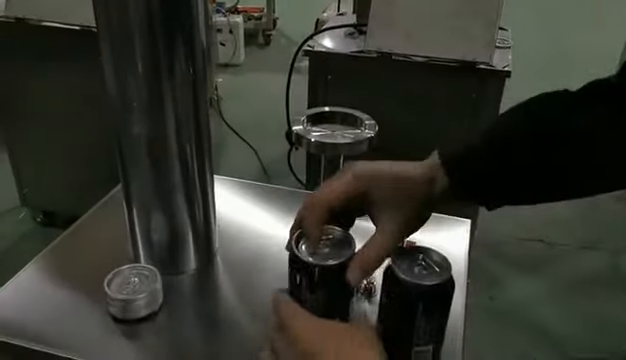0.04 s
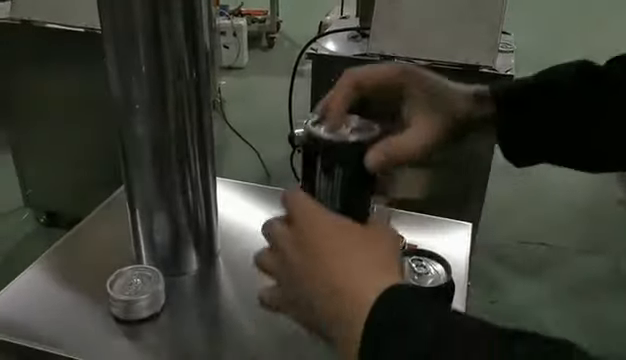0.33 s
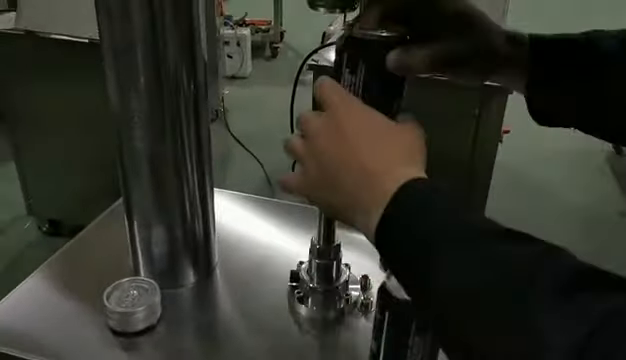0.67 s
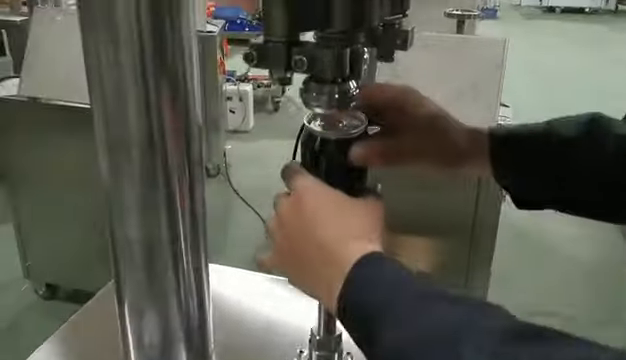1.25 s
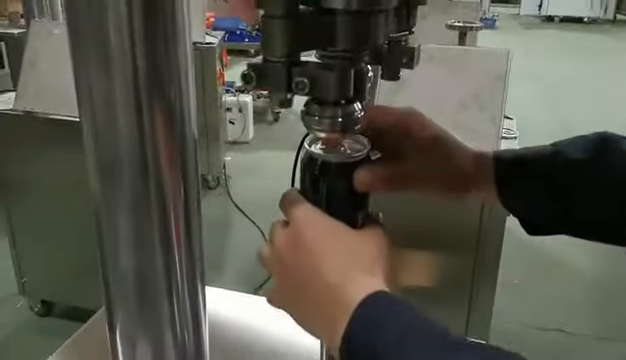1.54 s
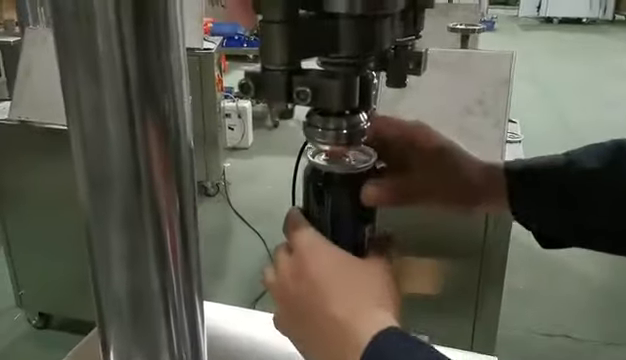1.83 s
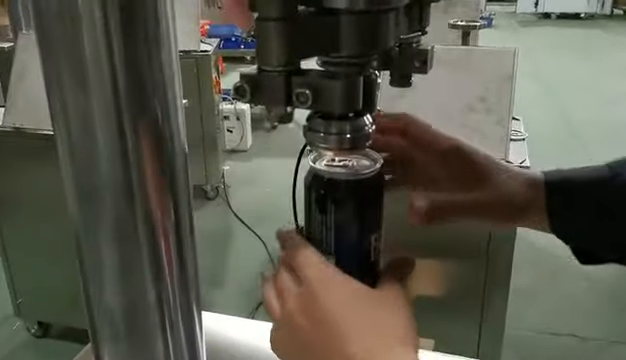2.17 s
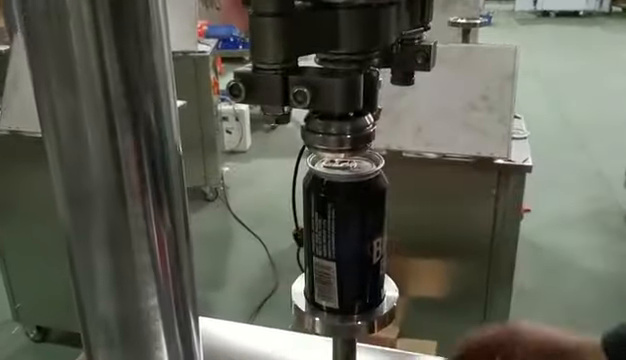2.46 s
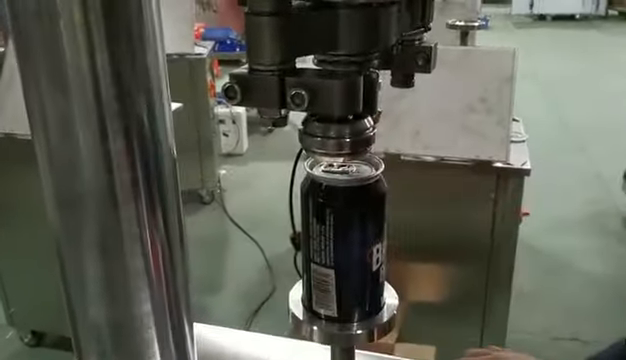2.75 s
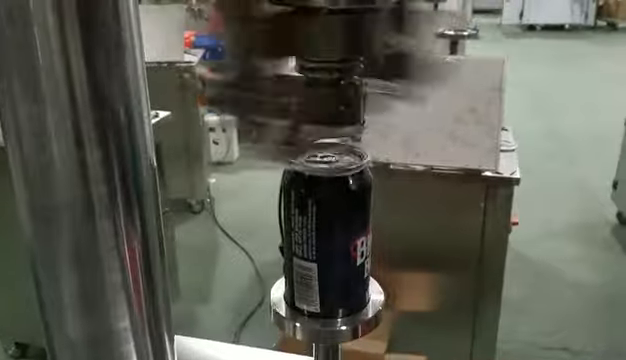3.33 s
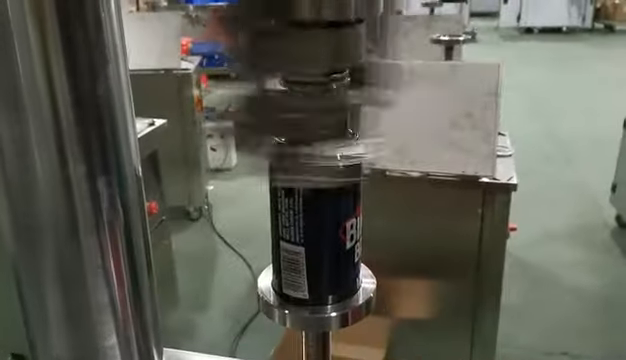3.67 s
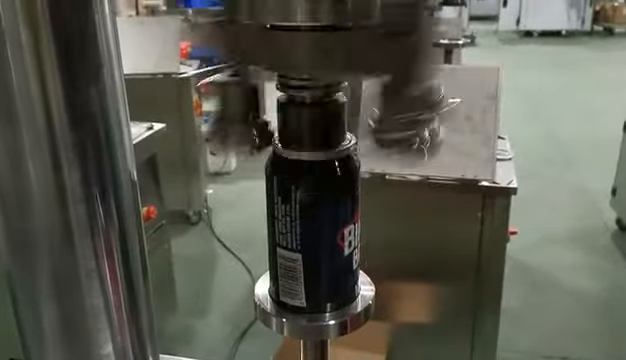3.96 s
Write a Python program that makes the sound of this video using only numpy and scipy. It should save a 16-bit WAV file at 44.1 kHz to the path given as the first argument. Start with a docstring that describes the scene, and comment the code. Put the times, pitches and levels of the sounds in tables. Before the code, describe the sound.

A can seaming machine clunks and whirs into motion after a can clacks into place.

```python
"""In an echoing workshop, with something scraping far off, a drinks can goes into a seaming machine.
The can rubs on its seat and clacks against the steel chuck that holds it; its lid is pressed home.
A knock rings the table, steel parts tick, an air valve hisses and the machine clunks into motion.
The motor hums, the gears whine and rattle, and the drone swells as spinning rollers close on the lid."""
import sys
import numpy as np
from scipy import signal
from scipy.fft import rfft, irfft
from scipy.io import wavfile

SR = 44100
rng = np.random.default_rng(int(sys.argv[2]) if len(sys.argv) > 2 else 0)


def unload_wav(signal):
    """Save mono or channel-first audio to the path in sys.argv[1] as 16-bit WAV at rate SR, clipped to [-1, 1]."""
    wavfile.write(
        sys.argv[1],
        SR,
        np.round(np.clip(np.atleast_2d(signal).T, -1, 1) * 32767).astype(np.int16),
    )


N = 176400
TIME, FREQS = np.arange(N) / SR, np.fft.rfftfreq(N, 1 / SR)
NOISE_TOP_HZ, CUTOFF_HZ = 7570, 8300
# how alike the two ears hear each pitch: (pitch [Hz], likeness [0 to 1])
EAR_LIKENESS = [(50, 0.89), (180, 0.94), (400, 0.81), (700, 0.6), (1200, 0.13), (2200, 0.022),
                (7500, 0.049)]


def from_db(db):
    """Turn decibels into a number to multiply by."""
    return 10 ** (np.asarray(db) / 20)


def rms_one(x):
    """Scale a signal to an average power of 1."""
    return x / np.sqrt(np.mean(x ** 2) + 1e-20)


def in_time(rows):
    """Join a table's timed rows with straight lines: one curve for each value column."""
    times, *columns = np.transpose(rows)
    return [np.interp(TIME, times, column) for column in columns]


def at_hz(points, hz):
    """Read a (pitch, value) table at any pitch."""
    pitches, values = np.transpose(points)
    return np.interp(np.log(hz + 1), np.log(pitches), values)


def pan(db):
    """Left and right gains that make the left louder by db."""
    return from_db(np.array([[.5], [-.5]]) * db)


def drift(rate_hz):
    """A smooth random wobble of typical size 1."""
    return rms_one(irfft(rfft(rng.standard_normal(N)) / (1 + (FREQS / rate_hz) ** 4), N))


def noise(colour, ripple_db=0, top_hz=NOISE_TOP_HZ):
    """Stereo noise of a given tone colour; ripple adds the many small resonances of steel panels."""
    alike = at_hz(EAR_LIKENESS, FREQS)
    bumps = np.clip(rng.standard_normal(SR // 50), -2, 2)
    ripple = np.interp(FREQS / 45, np.arange(len(bumps)), bumps)  # a bump or dip every 45 Hz
    shape = from_db(at_hz(colour, FREQS) + ripple_db * ripple * np.minimum(FREQS / 1500, 1))
    mid, side = rfft(rng.standard_normal((2, N))) * shape * (FREQS < top_hz)
    return rms_one(irfft(np.sqrt(1 + alike) * mid + np.sqrt(1 - alike) * side * [[1], [-1]], N))


def swell(start, length, rise_s, fall_db_per_s):
    """A loudness curve that rises, holds, then dies away."""
    fall = from_db(-fall_db_per_s * np.maximum(TIME - start - length, 0))
    return np.clip((TIME - start) / rise_s, 0, 1) * fall


def strike(blows, notes, crack_db):
    """Each blow cracks briefly and rings an object's own notes; a soft blow leaves out the high ones."""
    out, t = np.zeros(N + SR), TIME[:SR // 2]
    hz, note_db, ring_s = np.transpose(notes)
    rings = np.sin(2 * np.pi * hz[:, None] * t) * from_db(-60 * t / ring_s[:, None])
    signs = (-1) ** np.arange(len(hz))
    for start, db, treble_limit in blows:
        vary_db = 1.5 * rng.standard_normal(len(hz))
        gains = signs * from_db(db + note_db + vary_db) / np.sqrt(1 + (hz / treble_limit) ** 4)
        burst = rng.standard_normal(len(t)) * np.exp(-t / 0.0017) + 1e-18
        crack = signal.sosfilt(signal.butter(2, treble_limit, fs=SR, output="sos"), burst)
        i = int(start * SR)
        out[i:i + len(t)] += gains @ rings + from_db(db + crack_db) * crack
    return out[:N]


def in_hall(x, near_db, hall_db, pan_db):
    """Add quick echoes off the machine and the long echo of the hall to a sound."""
    # tone colour of the echoes: (pitch [Hz], level [dB])
    echo_colour = [(100, -8), (400, 1.5), (1500, 2), (2300, -4), (4000, -2), (7500, -5.5)]
    t, near_fade_s, hall_fade_s = TIME[:SR], 0.12, 0.96
    near = noise(echo_colour)[:, :SR] * from_db(-60 * t / near_fade_s) * (t > .002)
    far = noise(echo_colour)[:, :SR] * from_db(-60 * t / hall_fade_s) * (t > .012)
    echoes = (from_db(near_db) * rms_one(near) + from_db(hall_db) * rms_one(far)) / np.sqrt(SR)
    return x * pan(pan_db) + signal.fftconvolve(x[None], echoes, axes=1)[:, :N]


def room_noise():
    """The low, steady background of the hall."""
    # its tone colour: (pitch [Hz], level [dB])
    colour = [(20, -10.5), (42, 1.5), (70, 3.5), (130, -1), (220, -5.5), (340, -4), (500, -12),
              (1000, -19.5), (2000, -30), (4000, -29), (7500, -34.5)]
    return from_db(-54) * noise(colour)


def far_scraping():
    """Distant scraping strokes, each a grainy body and a hiss, hang in the hall."""
    # the strokes: (start [s], length [s], body level [dB], hiss level [dB])
    strokes = [(-0.12, 0.12, -53.5, -75), (0.33, 0.14, -70, -63.5), (1.105, 0.12, -44.5, -57),
               (1.245, 0.16, -48.5, -64.5), (1.8, 0.09, -48.5, -58.5), (1.969, 0.14, -41, -49)]
    # tone colours of the two parts: (pitch [Hz], level [dB])
    body_colour = [(150, -16.5), (300, -5.5), (500, -10), (670, -3), (930, -12.5), (1130, -8.5),
                   (1500, -15.5), (2200, -17), (3300, -18.5), (5000, -29), (8000, -44)]
    hiss_colour = [(500, -18), (2000, -1), (2650, -7.5), (4000, -0.5), (5400, -2.5), (6400, 0), (7500, 1.5)]
    body_power = hiss_power = 0
    for start, length, body_db, hiss_db in strokes:
        stroke = swell(start, length, rise_s=0.042, fall_db_per_s=52)
        body_power += (from_db(body_db) * stroke) ** 2
        hiss_power += (from_db(hiss_db) * stroke) ** 2
    grain = from_db(0.26 * drift(40))
    body = np.sqrt(body_power) * grain * noise(body_colour, ripple_db=3.5)
    return body + np.sqrt(hiss_power) * noise(hiss_colour)


def can_rubbing():
    """The can slides on its seat; each rub keeps one of its high notes ringing."""
    # the rubs: (start [s], length [s], level [dB], pitch [Hz], spread to each side [Hz])
    rubs = [(0.4, 0.098, -64.5, 5400, 330), (0.41, .11, -68, 2590, 110), (0.825, 0.027, -66, 4920, 80),
            (0.925, 0.08, -66, 4930, 100), (0.922, .02, -65, 7380, 280), (1.125, .04, -58.5, 6030, 170),
            (1.135, .06, -60, 7250, 280)]
    out = 0
    for start, length, db, hz, spread_hz in rubs:
        band = (FREQS < NOISE_TOP_HZ) / (1 + ((FREQS - hz) / spread_hz) ** 2)
        ring = rms_one(irfft(rfft(rng.standard_normal((2, N))) * band, N))
        out += from_db(db) * swell(start, length, rise_s=0.0088, fall_db_per_s=113) * ring
    return out


def rim_skitter(count, start_s, end_s):
    """Light, uneven blows as the rim skitters round the chuck while it is centred."""
    when, size = rng.random((count, 2)).T
    times = start_s + (end_s - start_s) * (np.arange(count) + when) / count
    quietest_db, range_db, treble_limit_hz = -53, 14, 2000
    return [(t, quietest_db + range_db * u, treble_limit_hz) for t, u in zip(times, size)]


def can_clacks():
    """The hand-held can hits the steel chuck and rings briefly."""
    # taps on the chuck: (time [s], level [dB], treble limit [Hz])
    taps = [(0.8036, -13, 9100), (0.8122, -31, 9100), (0.8170, -40, 9000), (0.914, -32, 1700),
            (0.936, -33, 2000), (0.991, -30, 1660), (1.010, -36, 1180), (1.024, -39, 1390)]
    # the can's notes: (pitch [Hz], level [dB], ring time [s])
    notes = [(144.8, -39, 0.96), (337, -36, 0.24), (753, -31, 0.0075), (810, -7.5, 0.012),
             (1403, -5, 0.0077), (1860, -6, 0.0074), (2050, -4, 0.012), (2490, -8, 0.0057),
             (3500, -15, .007), (4770, -41, 0.19), (5660, -19, 0.008), (6160, -17, 0.016),
             (7410, -11.5, 0.0089)]
    can = strike(list(taps) + rim_skitter(count=8, start_s=0.824, end_s=1.04), notes, crack_db=-36)
    for hz, sharpness in (1130, 6.7), (4200, 4.5):  # the hollow can gives off little at these pitches
        can = signal.lfilter(*signal.iirnotch(hz, sharpness, fs=SR), can + 1e-18)
    return in_hall(can, near_db=-14, hall_db=-16.5, pan_db=3.5)


def lid_and_plate():
    """The lid is pressed home on the can, then the lifting plate is bumped."""
    # blows on each part: (time [s], level [dB], treble limit [Hz])
    lid_presses = [(1.231, -39.5, 1100), (1.420, -40.5, 1990), (1.440, -39, 1800)]
    plate_bumps = [(1.826, -45.5, 2940)]
    # each part's notes: (pitch [Hz], level [dB], ring time [s])
    lid_notes = [(383, -3, 0.069), (450, -6, 0.051), (774, 1.5, 0.043), (1177, 2.5, 0.019),
                 (1325, 1.5, 0.029), (1640, -11.5, 0.053)]
    plate_notes = [(640, 5, 0.2), (1134, -11, 0.043)]
    lid = strike(lid_presses, lid_notes, crack_db=4)
    plate = strike(plate_bumps, plate_notes, crack_db=-10)
    return in_hall(lid + plate, near_db=-8.5, hall_db=-13.5, pan_db=3)


def table_knock():
    """One hard knock rings the machine's table."""
    # the knock: (time [s], level [dB], treble limit [Hz])
    knocks = [(2.3915, -34, 6850)]
    # the table's notes: (pitch [Hz], level [dB], ring time [s])
    notes = [(475, 0, 0.096), (385, -4.5, 0.069), (570, -5.5, .035), (748, -12, 0.028), (850, -9.5, 0.042),
             (1020, -11, 0.12), (1404, -12.5, .04), (3680, -16, 0.032), (4630, -15, 0.026),
             (5230, -10.5, 0.012), (6200, -9.5, .012), (7640, -16, .012)]
    return in_hall(strike(knocks, notes, crack_db=-3.5), near_db=-6.5, hall_db=-18.5, pan_db=-0.5)


def steel_ticks():
    """Steel parts touch, and the rollers give short, high rings."""
    # the touches: (time [s], level [dB], treble limit [Hz])
    ticks = [(2.492, -44.5, 2750), (2.664, -44.5, 3520), (3.6108, -33, 9000)]
    # the rollers' notes: (pitch [Hz], level [dB], ring time [s])
    notes = [(2026, -3, 0.014), (2510, -4.5, 0.038), (2850, -4.5, 0.03), (4660, -8, 0.0077),
             (7800, -5, 0.0043)]
    return in_hall(strike(ticks, notes, crack_db=1.5), near_db=-6, hall_db=-11, pan_db=-9.5)


def air_valve():
    """A faint, bright hiss swells quickly into the valve's sharp blast of air, which echoes in the hall."""
    # tone colours of the hiss and the blast: (pitch [Hz], level [dB])
    rising_hiss_colour = [(500, 1), (4200, -3.5), (5800, 0), (7200, 7.5), (8400, -21)]
    blast_colour = [(150, -10), (450, 2), (2200, -5), (3550, 7), (4100, -10.5), (4800, 5), (5700, 4.5),
                    (7000, 1.5), (8400, -9)]
    blast_s, hold_s, rise_s = 2.6855, 0.011, 0.0015
    growth = from_db(-33 + 560 * np.minimum(TIME - blast_s, 0)) * (TIME < blast_s + rise_s)
    rising_hiss = growth * noise(rising_hiss_colour, ripple_db=6.5, top_hz=CUTOFF_HZ) * pan(7)
    puff = swell(blast_s, hold_s, rise_s, fall_db_per_s=480)
    blast = puff * noise(blast_colour, ripple_db=1.5, top_hz=CUTOFF_HZ) * pan(-2.5)
    echo = from_db(-22) * swell(blast_s, hold_s, rise_s=0.0076, fall_db_per_s=65) * noise(blast_colour)
    return rising_hiss + from_db(-23.5) * (blast + echo)


def frame_clunks():
    """The drive jolts the machine's frame, which rings low."""
    # the jolts: (time [s], level [dB], treble limit [Hz])
    jolts = [(2.664, -43, 3000), (2.715, -31.5, 1500), (2.726, -33.5, 1780), (2.739, -28.5, 1500),
             (2.774, -26, 600), (2.787, -32.5, 500), (2.848, -34.5, 703), (3.122, -32.5, 200),
             (3.594, -37.5, 900), (3.732, -31, 200), (3.846, -23, 139), (3.931, -31, 250)]
    # the frame's notes: (pitch [Hz], level [dB], ring time [s])
    notes = [(110.7, 0, 0.27), (156, 4, 0.11), (234, -2.5, 0.045), (343, -15, 0.075), (439, -4.5, 0.077),
             (582, -9, 0.12), (812, -12.5, 0.12), (1250, -4, 0.027)]
    return in_hall(strike(jolts, notes, crack_db=-3), near_db=-6, hall_db=-14, pan_db=3)


def motor_hum(throb_db):
    """Motor and gears hum and whine; as the rollers bite, the load lifts the tones near one pitch."""
    # the tones: (pitch [Hz], level before the load [dB], wander [share of pitch])
    tones = [(65.8, -53, 0.0043), (100.1, -39.5, 0.014), (118.4, -43.5, 0.03), (161.5, -41.5, 0.015),
             (243, -48, 0.0065), (300.5, -47, 0.0022), (515, -55.5, 0.003), (639, -46.5, 0.0038),
             (816, -57, 0.0015), (943, -55.5, 0.0027), (1130, -57.5, 0.0018), (1257, -58.5, 0.0024)]
    bite_s, bite_rise_s, load_hz, load_width_hz = 3.56, 0.17, 263, 48
    load = np.clip((TIME - bite_s) / bite_rise_s, 0, 1)
    hum = 0
    for hz, db, wander in tones:
        load_db = 11.5 * np.exp(-((hz - load_hz) / load_width_hz) ** 2)
        phase = 2 * np.pi * np.cumsum(hz * (1 + wander * drift(12))) / SR
        ear_shift = np.arccos(at_hz(EAR_LIKENESS, hz)) * rng.choice([-.5, .5]) * np.array([[1], [-1]])
        flutter = from_db(4.5 * drift(8) + throb_db * (hz < 140))  # only the bass throbs
        hum += from_db(db + load_db * load) * rms_one(flutter * np.sin(phase + ear_shift))
    return hum


def chatter(contacts_per_s, fade_s, share):
    """A jittery loudness curve: gear teeth and rollers make brief, uneven contacts."""
    sizes = from_db(3.5 * np.minimum(rng.exponential(1, N), 4))
    contacts = sizes * (rng.random(N) < contacts_per_s / SR)
    bursts = rms_one(signal.lfilter([1], [1, -np.exp(-1 / (fade_s * SR))], contacts + 1e-18))
    return rms_one(1 - share + share * bursts)


def running_machine():
    """Over the motor's hum and the frame's rumble, the head whirs and its rollers rattle and sizzle."""
    # how the noises rise and fall: (time [s], rumble [dB], whir [dB], rattle [dB], hiss and sizzle [dB])
    levels = [(2.72, -45, -25, -38.5, -63), (2.80, -47.5, -37.5, -43, -51), (2.83, -32, -39.5, -43.5, -52),
              (2.858, -29, -38.5, -37.5, -54), (2.93, -38.5, -43.5, -48, -54.5),
              (3.06, -40.5, -38, -49.5, -62), (3.13, -33, -39.5, -52, -64), (3.20, -40.5, -38, -54, -64),
              (3.31, -36.5, -36, -49, -58), (3.436, -31, -38, -51.5, -61), (3.585, -43.5, -39, -61.5, -67),
              (3.68, -36.5, -36.5, -65, -69.5), (3.75, -36.5, -36.5, -58, -66.5),
              (3.83, -35.5, -40.5, -62, -60.5), (3.878, -35, -34.5, -44.5, -61.5),
              (3.928, -33, -36.5, -59, -52), (4.0, -36, -37.5, -52, -57)]
    # how the sound sways sideways: (time [s], shift to the left [dB])
    sway = [(2.75, 1), (2.95, -1), (3.15, -5), (3.55, -5.5), (3.8, -3), (4.0, 0.5)]
    # tone colours of the noises: (pitch [Hz], level [dB])
    rumble_colour = [(25, -25), (46, -9), (72, -22.5), (92, -4), (125, -0.5), (180, 2.5), (215, -2.5),
                     (340, -8), (480, -10), (900, -27.5), (3000, -61)]
    whir_colour = [(150, -41.5), (330, 4.5), (450, -2.5), (700, 0), (860, -5.5), (1250, -9.5),
                   (1600, -16.5), (3000, -25), (7500, -57.5)]
    rattle_colour = [(600, -4.5), (1400, 0.5), (2100, -1), (2750, -3), (3400, -9), (3850, -4.5),
                     (5000, -13.5), (7500, -20.5)]
    hiss_colour = [(1500, -18.5), (3500, 1.5), (4600, 0.5), (5600, 4), (6500, 3), (7500, -4)]
    sizzle_colour = [(5500, -25), (6600, -10.5), (7300, 2), (7600, -12)]
    start_s, spin_up_s, turn_s, throb_peak_s = 2.70, 0.041, 0.12, 2.3
    rumble_db, whir_db, rattle_db, hiss_db = in_time(levels)
    left_db, = in_time(sway)
    throb_db = 4 * np.cos(2 * np.pi * (TIME - throb_peak_s) / turn_s)  # once per turn of the head
    hum = motor_hum(throb_db)
    contacts = chatter(contacts_per_s=260, fade_s=0.013, share=0.18)
    rumble = from_db(rumble_db + 0.5 + 0.57 * throb_db) * noise(rumble_colour)
    whir = from_db(whir_db - 1.5) * noise(whir_colour, ripple_db=4.5)
    rattle = from_db(rattle_db + 1) * noise(rattle_colour, ripple_db=3.5)
    hiss = from_db(hiss_db + 2 * drift(60)) * noise(hiss_colour, ripple_db=-3.5)
    sizzle = from_db(hiss_db - 3 + 3.5 * drift(33)) * noise(sizzle_colour)
    bass = (hum + rumble) * pan(left_db + 4)
    middle = contacts * (whir + rattle) * pan(left_db)
    treble = (hiss + sizzle) * pan(left_db - 2)
    return np.clip((TIME - start_s) / spin_up_s, 0, 1) * (bass + middle + treble)


def scene():
    """Everything heard beside the machine."""
    workshop = room_noise() + far_scraping()
    handling = can_rubbing() + can_clacks() + lid_and_plate() + table_knock()
    machine = steel_ticks() + air_valve() + running_machine() + frame_clunks()
    return workshop + handling + machine


def record(dry):
    """Cut off the highest treble steeply."""
    return signal.sosfilt(signal.ellip(12, .2, 80, CUTOFF_HZ, fs=SR, output="sos"), dry)


dry = scene()
out = record(dry)
unload_wav(out)
```